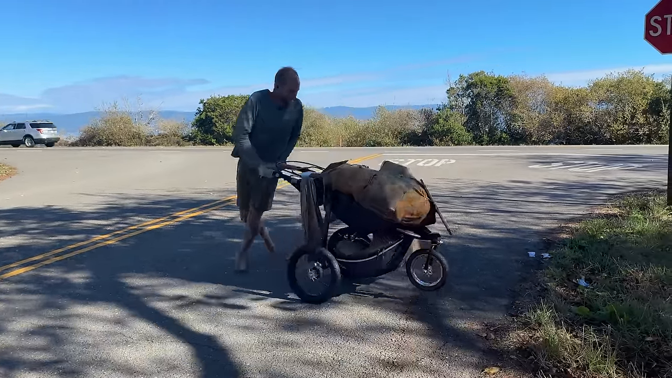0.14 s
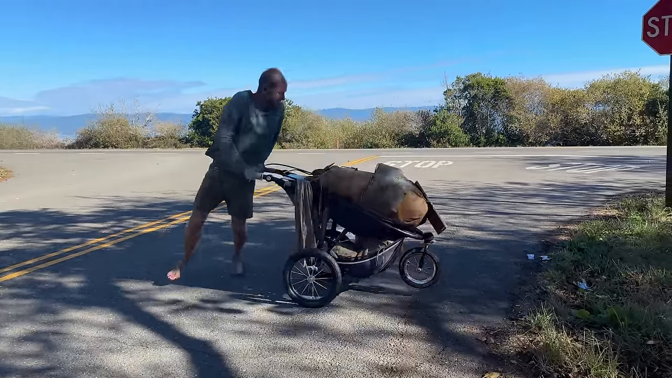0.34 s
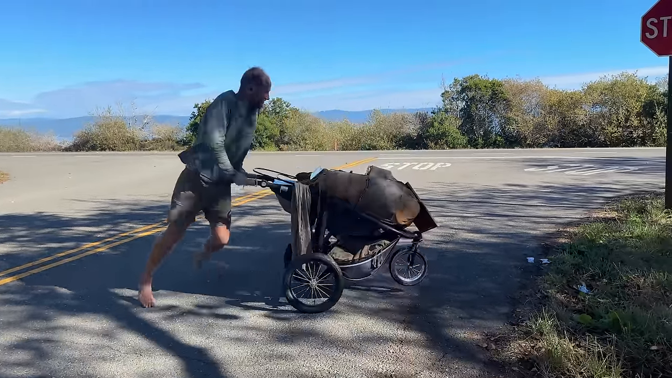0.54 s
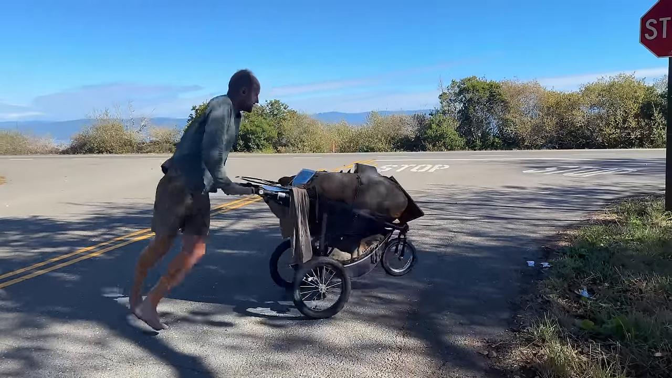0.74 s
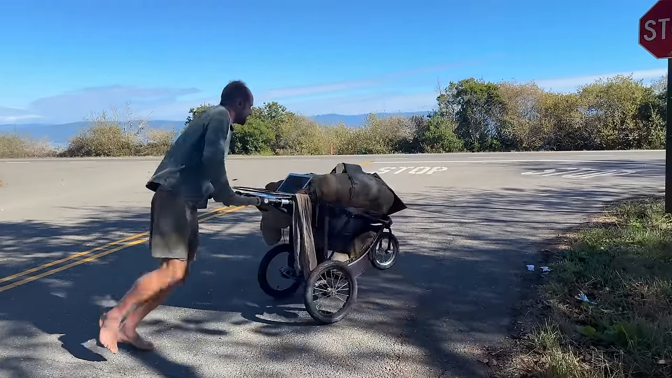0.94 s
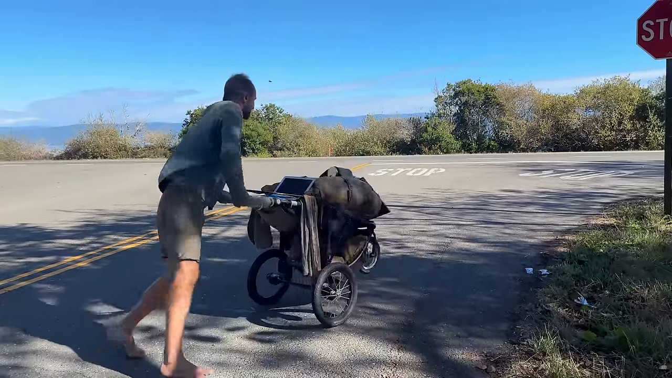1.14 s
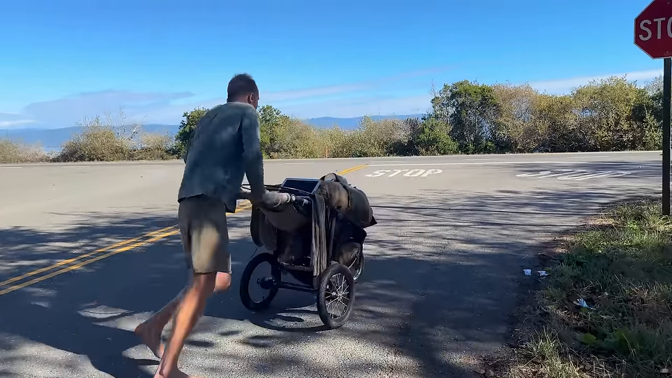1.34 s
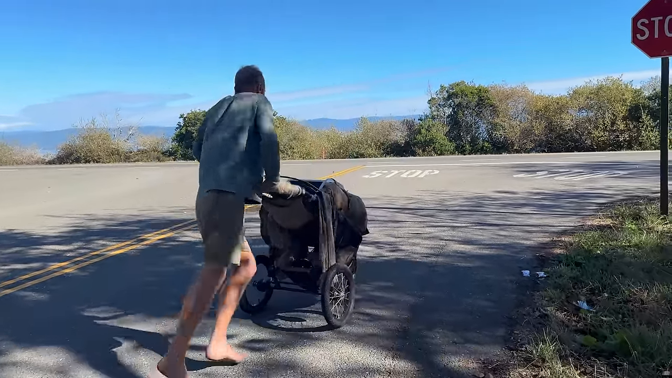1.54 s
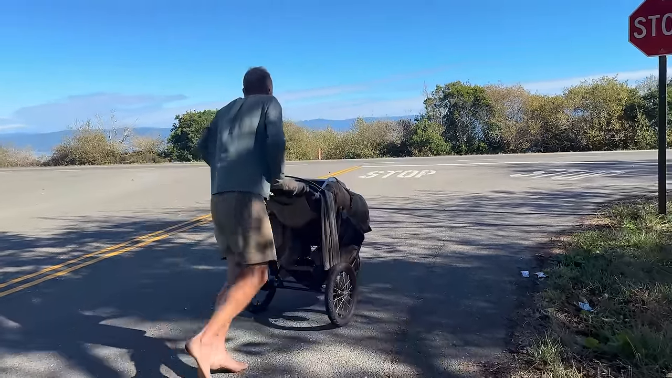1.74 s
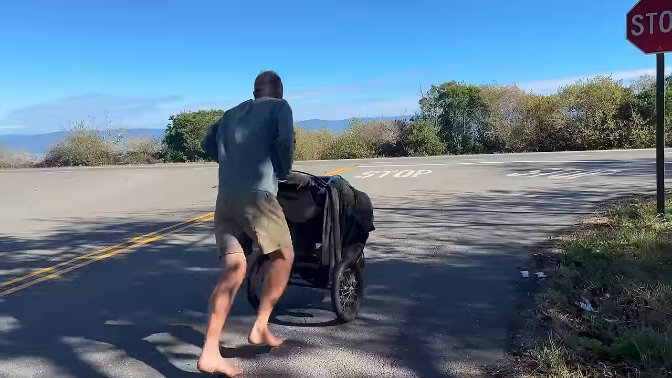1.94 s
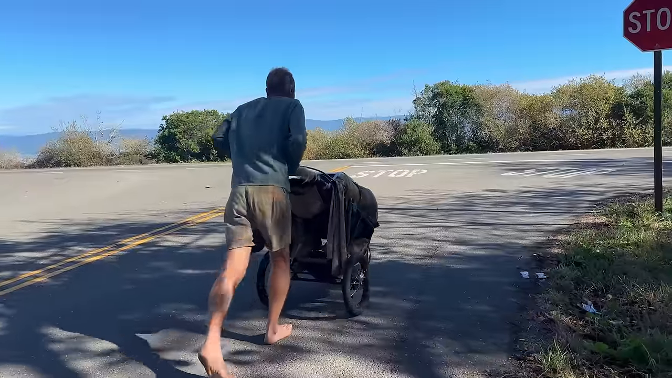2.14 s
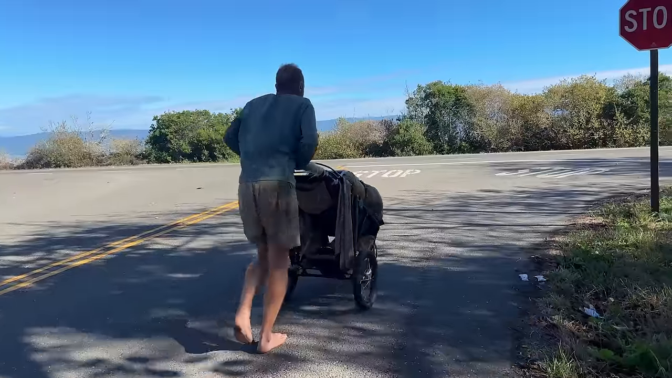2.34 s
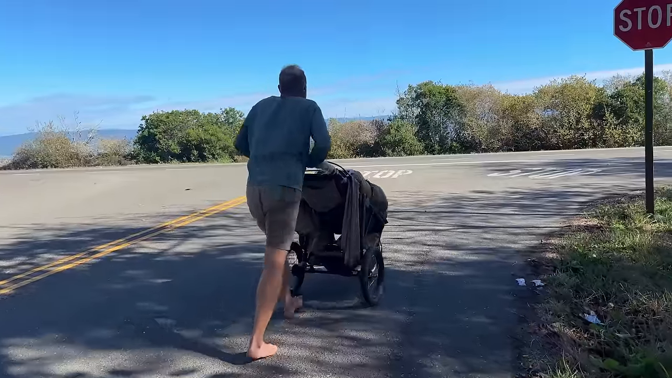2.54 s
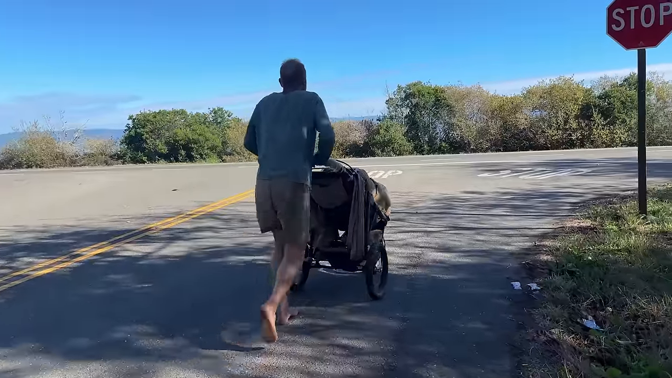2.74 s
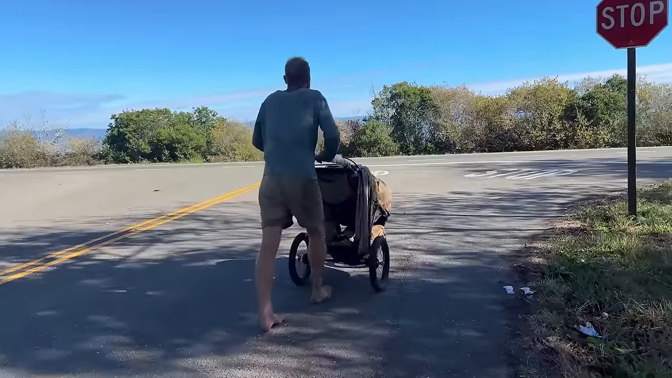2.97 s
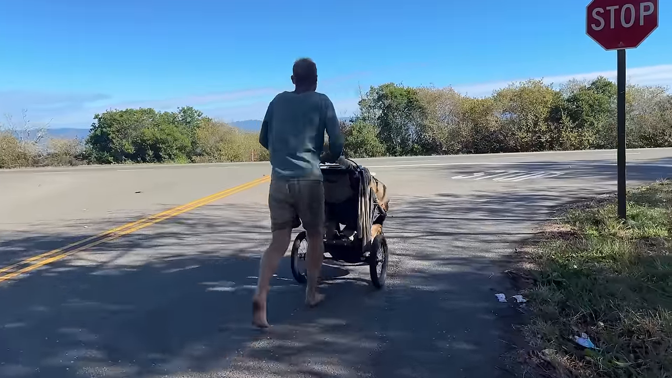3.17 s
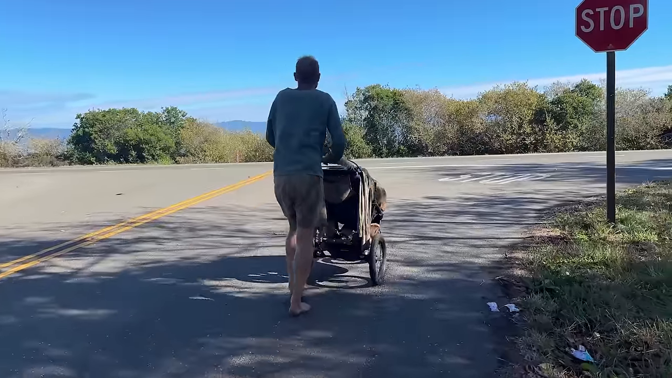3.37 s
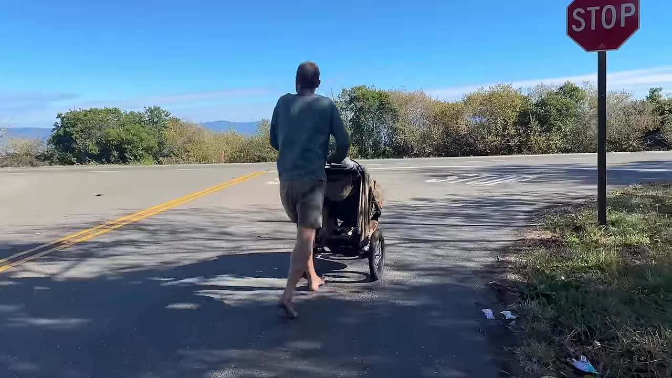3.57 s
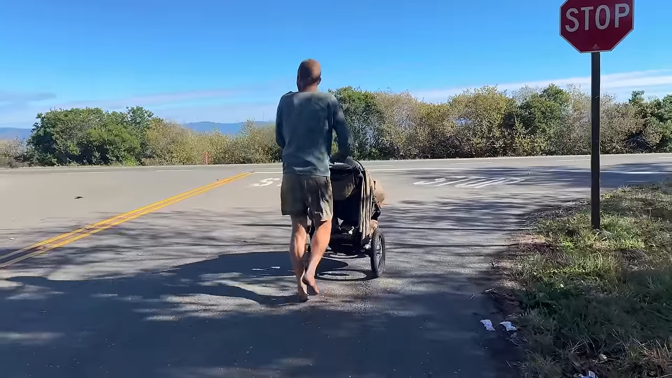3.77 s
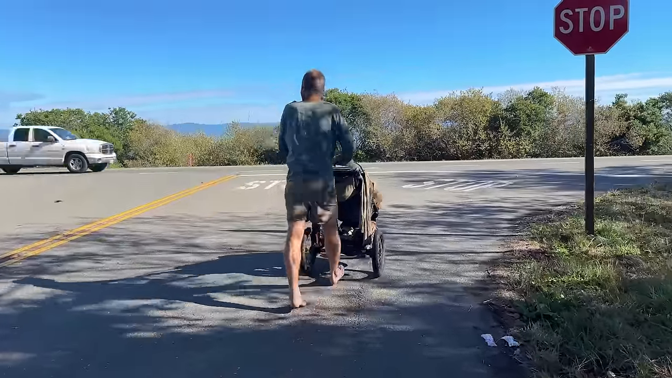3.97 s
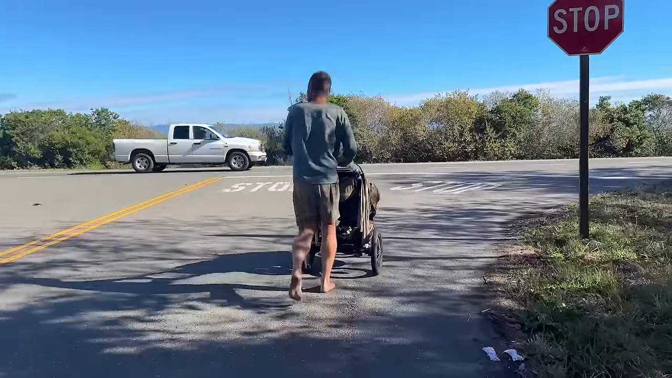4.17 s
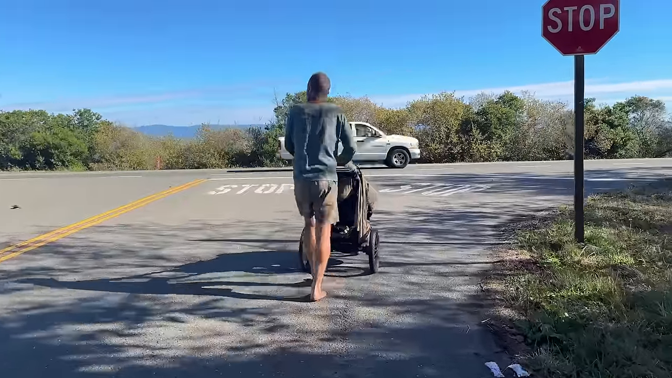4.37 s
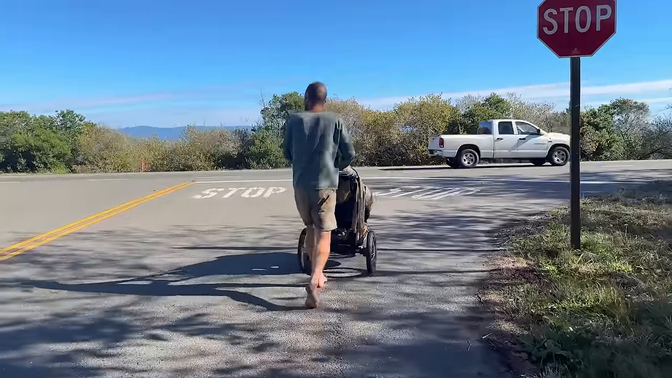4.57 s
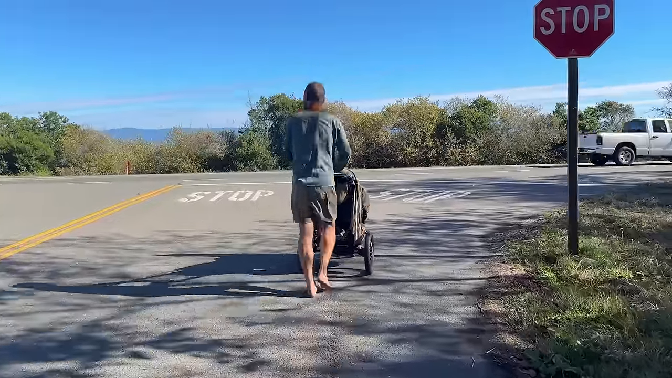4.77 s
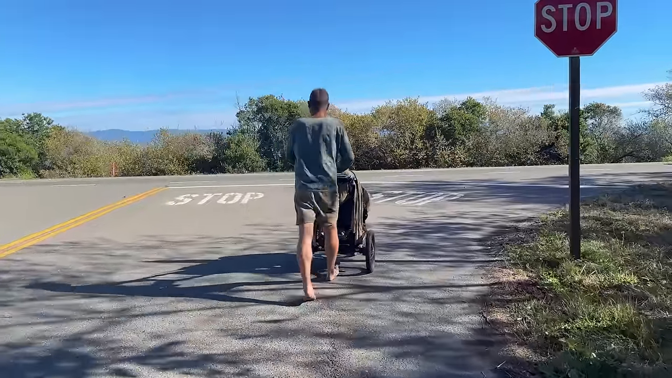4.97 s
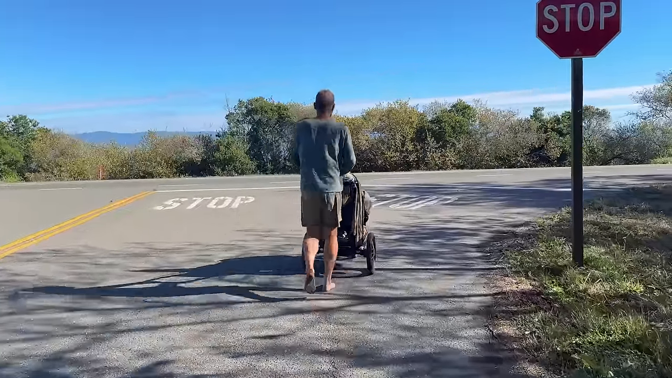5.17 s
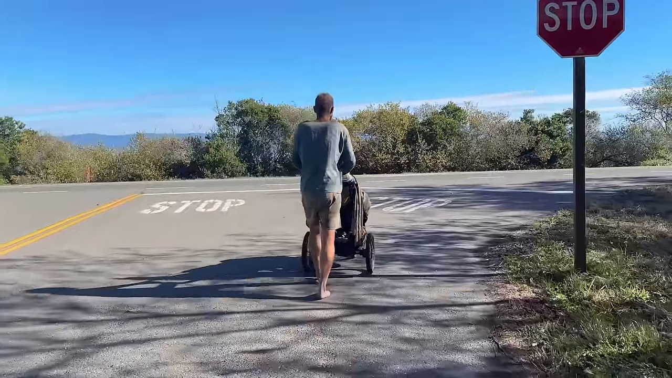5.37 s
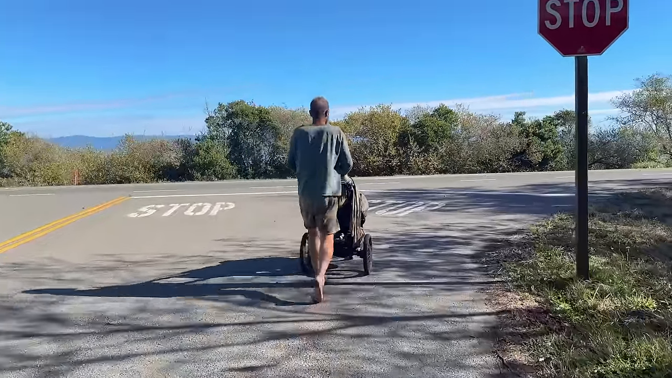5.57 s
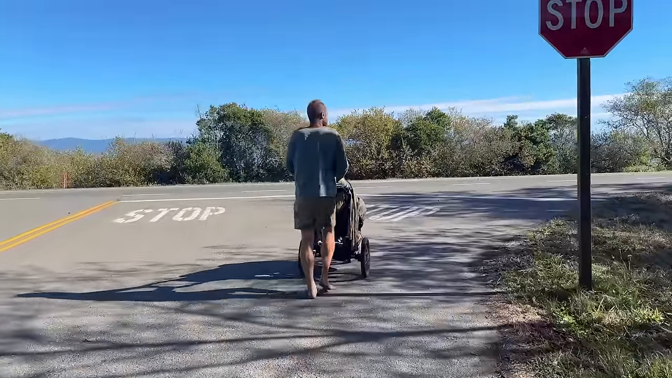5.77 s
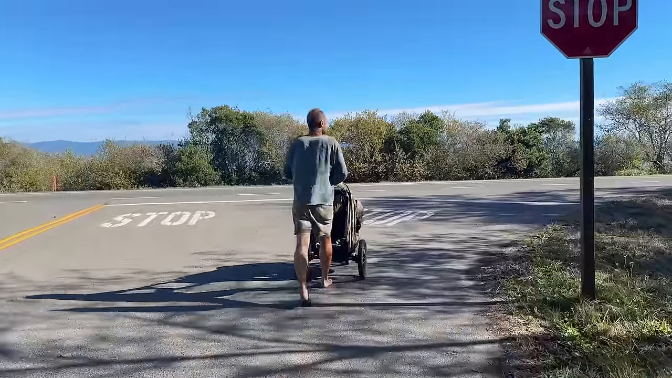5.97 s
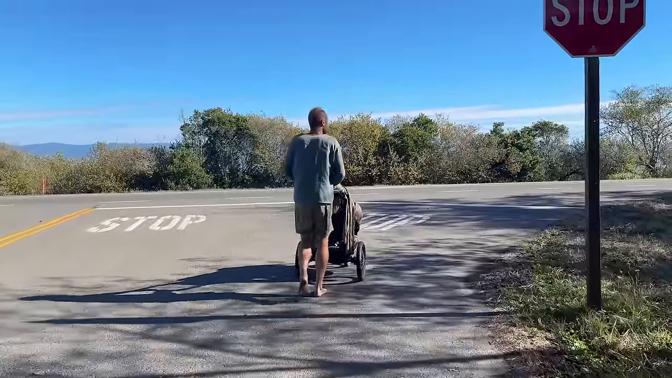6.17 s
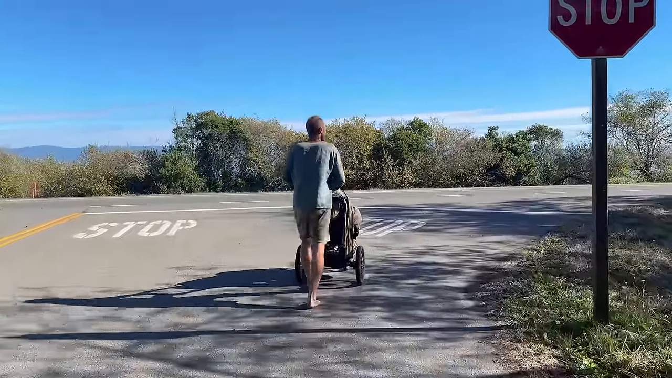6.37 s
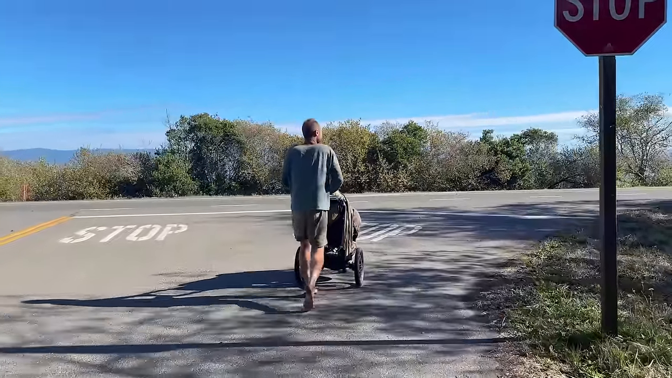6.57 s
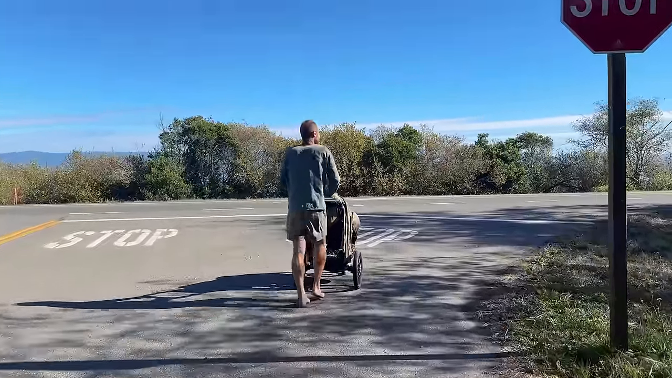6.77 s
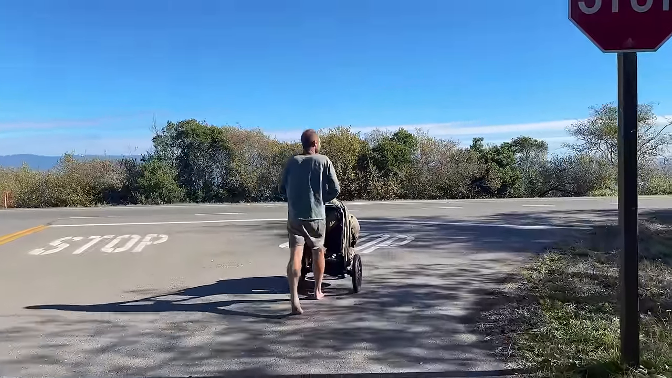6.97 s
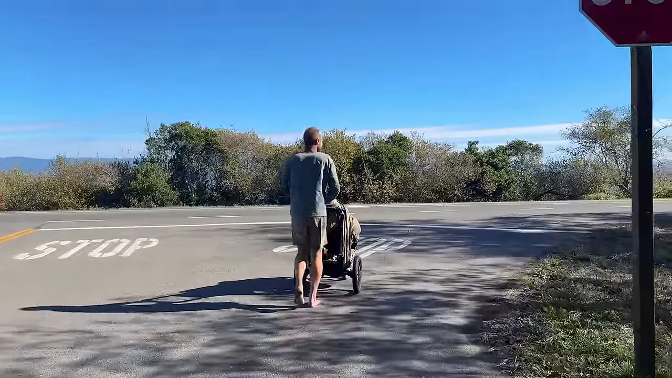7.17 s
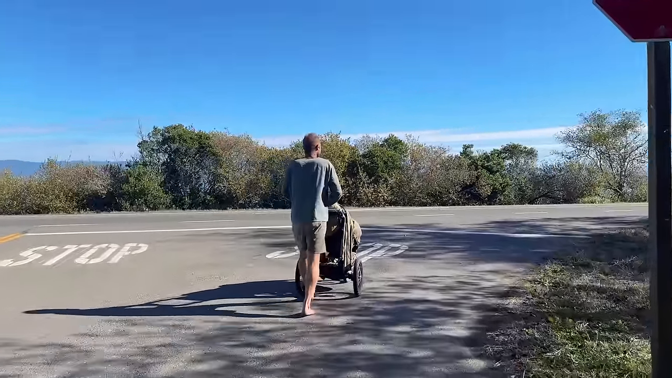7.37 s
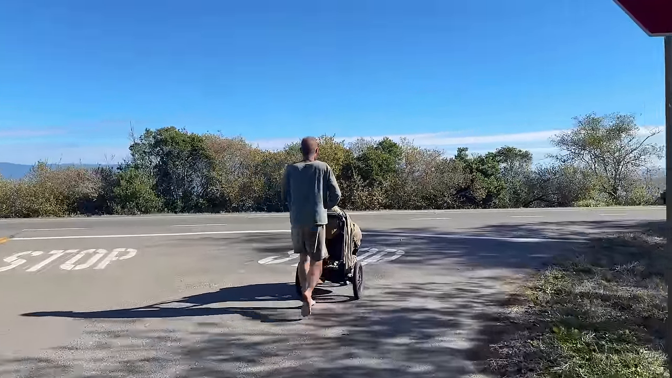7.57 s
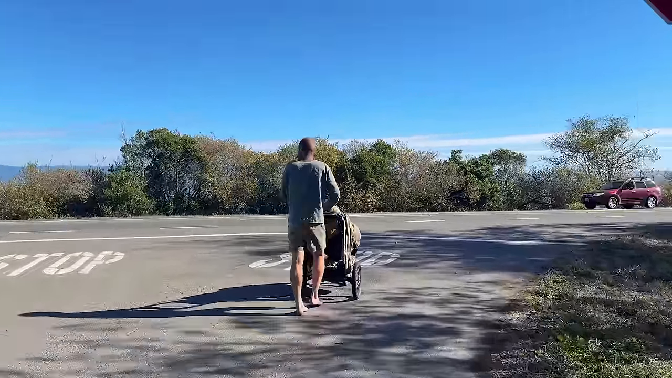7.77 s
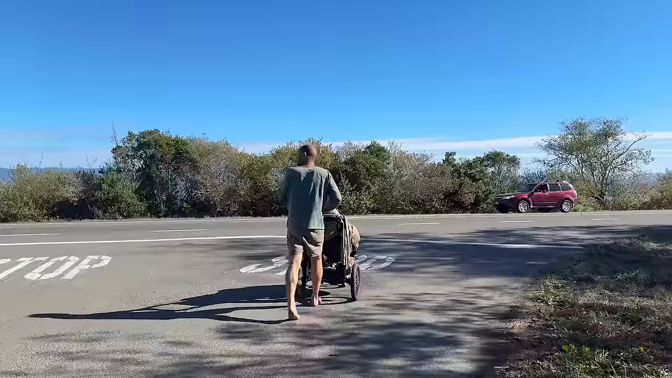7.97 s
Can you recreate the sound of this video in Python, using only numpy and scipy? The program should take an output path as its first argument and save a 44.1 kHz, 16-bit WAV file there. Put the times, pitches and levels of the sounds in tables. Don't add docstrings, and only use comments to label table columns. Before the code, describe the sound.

Roadside tyre roar swells and fades as a truck passes, with faint gritty footsteps, two twig cracks, soft low bumps and late insect hiss.

```python
import sys
import numpy as np
from scipy import signal
from scipy.fft import rfft, irfft, next_fast_len
from scipy.io import wavfile
from scipy.ndimage import uniform_filter1d

SR = 44100
rng = np.random.default_rng(int(sys.argv[2]) if len(sys.argv) > 2 else 0)


def voltage_ratio(decibels):
    exponent = np.asarray(decibels, float) / 20
    return 10 ** exponent


def wav_out(sig):
    wavfile.write(sys.argv[1], SR, np.round(np.clip(np.atleast_2d(sig).T, -1, 1) * 32767).astype(np.int16))


N = 353682
FRAME, HOP = 2048, 512

# at_s, place_m (left of centre), speed_m_per_s (to the left), lane_distance_m, roar_hz
VEHICLES = [
    (0.0, 4, 23, 17.8, 1020),
    (4.35, 0.56, -24, 14.5, 804),
    (8.0, -10, 19, 19.3, 827),
]
# rumble_db, drone_db, boom_db, roar_db, tread_db, hiss_db, rush_db, top_db
VEHICLE_LAYERS = [
    (-91, -39.5, -40, -37.5, -50, -69.5, -79, -88),
    (-32, -30.5, -28.5, -23.5, -32, -41.5, -48.5, -59),
    (-37.5, -44.5, -34.5, -29, -38, -49.5, -54, -75),
]
FAR_TRAFFIC = (-60.5, -59.5, -52, -51.5, -95, -90, -83, -100)
LAYER_HZ = [65, 140, 300, 780, 1750, 4200, 7600, 13500]
# frequency_hz, density_db (per Hz)
COLOUR = [(45, -15.5), (100, -14.5), (260, -21), (480, -24), (800, -27.5), (1050, -24), (1250, -23),
          (1900, -28.5), (2800, -31.5), (5000, -31), (8500, -30.5), (10000, -31), (14000, -25),
          (15800, -33)]
# loss_db (per doubled distance), near_hedge_db, far_hedge_db, louder_ahead_db
TRAVEL = [(5, 2.5, -0.9, -1.9), (8, -0.5, 7, 0.9), (7.5, 4.5, 4, 2), (6.5, 4.5, 1.7, 0.84),
          (7, 4.5, 1.5, 2), (6.5, 3, 9.5, 1.3), (8, 3, 14.5, 0.2), (6.5, 3.5, 20.5, 2.2)]
GAPS = [(-12, 2.1, 20.9, 3.8), (-29, 6.3, 27.6, 2.4)]
# start_s, engine_load_db, tyre_noise_db (rough or smooth asphalt)
EFFORT = [(0, -4, 1.5), (.7, 0.5, -0.8), (1.3, 1.5, -0.2), (1.85, 0.5, -4.5), (2.3, -1, -0.5),
          (2.65, 1.5, 1.5), (3.1, 2, 5.5), (3.45, 1.6, -5.5), (3.7, -1, 3), (4.1, 1, 0), (4.45, 2.2, -1.5),
          (4.75, 1.5, 1), (5.3, -0.6, 3.5), (6.0, -7, -1.5), (6.5, 1, -0.5), (7.0, 3, 3.5), (7.45, 4, 3.5),
          (7.75, 4.2, -0.5)]
# start_s, level_db
CLEARNESS = [(0, 6), (.5, -0.5), (1.9, -6), (2.5, -2.3), (3.0, -2), (3.35, 4), (3.8, 0.2), (4.2, 0.4),
             (4.4, -4.5), (4.9, -0.8), (5.3, -1.5), (5.8, 4), (6.3, 0.5), (6.8, 5.5), (7.3, -1.2),
             (8.02, -3.5)]
FOLLOWS = [(0.34, .01, .01), (1.46, .01, .01), (0.57, 0.11, .01), (.01, 1.06, .01), (.01, 0.4, 0.39),
           (.01, 0.43, 0.72), (.01, .3, 1.2), (.01, .2, 0.37)]
# side (-1 right to 1 left), left_minus_right_db, ground_dip_hz, dip_depth_db
BEARING = [(-0.96, 0.5, 120, -3), (-.88, -3, 410, 7.5), (-0.48, -8.5, 436, 9.5), (-0.33, -5.5, 330, 0.5),
           (.3, -1.2, 350, 3), (0.56, 1, 420, 5.5), (1, 3.5, 528, 6.5)]
# frequency_hz, centre_lag_samples, side_lag_samples, balance_db, pan_share, likeness (0-1)
PORTS = [(100, -3, 23, 0.2, 0.035, 1), (270, -3, 20, 1, 0.0024, 0.99), (500, -2.5, 21.6, 0, 0.51, 0.99),
         (950, 0, 16.2, 0, 1, 0.9), (1167, -0.5, 15.7, -0.5, 0.92, 1), (1590, 1, 16.4, -3, 0.38, 0.77),
         (1850, 4.5, 14.65, -2.5, 0.29, 0.87), (4200, 4.5, 15.16, -3, 0, 0.78),
         (7360, 3.5, 14.9, -1.5, 0.31, 0.42)]
# start_s, crank_hz, level_db
FIRING = [
    (2.4, 44.9, -55),
    (3.4, 44.86, -43),
    (3.75, 44.07, -32),
    (4.0, 43.7, -23.5),
    (4.35, 42.6, -45),
    (4.7, 40.24, -26),
    (5.3, 40.03, -41.5),
    (6.2, 39.05, -49),
]
# order (per crank turn), level_db
ENGINE_ORDERS = [(2, 0), (3.2, -1)]
# start_s, peak_db, echo_ms, echo_share, top_db
TWIGS = [
    (3.0575, 0.5, .317, 0.51, -25),
    (6.7651, -11.5, 0.27, 0.37, -12),
]
# start_s, peak_db, ring_hz, top_db, low_db
GRIT = [(0.1221, -32.5, 4050, -16, -22), (0.1434, -36, 3940, -27, -19), (0.4279, -30, 5400, -17, -23),
        (0.5087, -38, 3120, -22, -10), (0.5277, -39.5, 3350, -15, -10), (1.3788, -32.5, 3440, -20, -8.5),
        (1.4526, -35, 3530, -17, -11), (1.507, -32, 5140, -17, -14), (1.582, -32.5, 5760, -38, -15),
        (2.1419, -37.5, 4320, -19, -3), (2.1869, -36, 3300, -17, -0.5), (2.2039, -35.5, 4430, -20, -4),
        (2.2318, -32.5, 3050, -15.5, -5), (2.2463, -33, 5860, -16, -15), (2.332, -36, 3490, -14, -18),
        (2.3481, -35, 5320, -13, -19), (2.389, -37, 3350, -16, -17), (2.471, -23.5, 3520, -16, -16),
        (2.4963, -38, 3540, -16, -12), (2.6653, -31.5, 4370, -12, -27), (2.7656, -36.5, 3530, -13, -18),
        (6.8533, -38, 4500, -19, -14), (6.9243, -39, 4000, -5.5, -16), (6.9331, -36, 4470, -17.5, -26)]
# start_s, peak_db, ring_hz
FINE_GRIT = [(0.2078, -44, 4600), (0.28, -48, 3010), (0.436, -43, 5950), (0.476, -41, 3130),
             (0.6739, -44, 3710), (0.687, -44, 4220), (0.7383, -38, 5070), (0.7642, -42, 3270),
             (0.7764, -40.5, 4150), (0.857, -42.5, 3390), (0.9717, -39, 6500), (0.9864, -43, 6290),
             (1.0195, -41, 3550), (1.3005, -39, 6040), (1.3279, -43, 4650), (1.8731, -46, 3390),
             (1.884, -44, 4670), (1.9339, -39.5, 4470), (1.9614, -41.5, 3330), (2.106, -38.5, 3170),
             (2.1295, -37, 3390), (2.1685, -35, 3130), (2.2627, -37.5, 6220), (2.2952, -38, 3350),
             (2.5515, -40.5, 6200), (2.736, -43, 3270), (6.0594, -51, 4630), (6.135, -48, 4350),
             (6.1724, -49, 4480), (6.319, -42.5, 4080)]
# start_s, peak_db
PATTER = [(.4944, -46), (.5561, -51), (.602, -55), (.7577, -41), (1.0614, -51), (1.712, -51), (1.8332, -51),
          (1.8612, -58), (1.9031, -56), (1.928, -43), (2.0702, -53), (2.0941, -46), (2.2764, -45),
          (2.6994, -54)]
# start_s, level_db, length_s
LEAVES = [(0.138, -71, .03), (.5, -74, .05), (0.765, -66, 0.078), (1.0, -74, 0.076), (1.197, -65, 0.082),
          (1.533, -66, 0.021), (1.6, -63, .025), (1.74, -58.5, 0.02), (1.94, -72, 0.013), (2.195, -83, .08),
          (2.34, -66, 0.039), (2.493, -62, 0.046), (2.585, -52, 0.023), (2.67, -63, .03)]
# start_s, peak_db, pitch_hz
BUMPS = [(0.549, -34, 53), (0.949, -49, 65.6), (2.098, -27.5, 71.4), (2.329, -35, 68.6), (2.489, -29, 53.8),
         (5.778, -29.5, 72), (6.4, -28, 80.5), (6.558, -48, 72.5), (6.925, -32, 81)]
# start_s, centre_hz, level_db
INSECTS = [(5.4, 11200, -89), (5.63, 11200, -82), (5.96, 11000, -82), (6.22, 11200, -81),
           (6.66, 10700, -71.5), (7.11, 11400, -61.5), (7.46, 11300, -57), (7.81, 11000, -62),
           (8.02, 11200, -60)]


def columns(rows, at):
    x, *rest = np.transpose(rows)
    return [np.interp(at, x, c) for c in rest]


def over_hz(rows, hz):
    rows = np.array(rows, float)
    return [np.interp(np.log(hz + 1), np.log(rows[:, 0]), c)[:, None] for c in rows.T[1:]]


def drift(rate_hz, count=1):
    pole = np.exp(-80 * np.pi * rate_hz / SR)
    push = rng.standard_normal((count, N // 40 + 2002))
    slow = signal.lfilter([1], [1, -2 * pole, pole * pole], push)[:, 2000:]
    slow = slow / slow.std(axis=1, keepdims=True)
    return np.array([np.interp(np.arange(N) / 40, np.arange(len(v)), v) for v in slow])


def spectra(x):
    return signal.stft(x, SR, nperseg=FRAME, noverlap=FRAME - HOP)


def sound(z):
    return signal.istft(z, SR, nperseg=FRAME, noverlap=FRAME - HOP)[1][..., :N]


def patchy(shape, lines, frames):
    patches = uniform_filter1d(rng.standard_normal(shape), size=lines, axis=0)
    patches = uniform_filter1d(patches, size=frames, axis=1)
    return patches / patches.std()


def band(x, low_hz, high_hz):
    return signal.sosfilt(signal.butter(2, [low_hz, min(high_hz, .45 * SR)], "band", fs=SR, output="sos"), x)


def bell(hz, centre_hz, octaves):
    return np.exp(-.5 * (np.log2((hz[:, None] + 1) / centre_hz) / octaves) ** 2)


def vehicles(s):
    at, place, speed, lane, roar_hz = np.transpose(VEHICLES)[:, :, None]
    along = place + speed * (s - at)
    distance = np.hypot(along, lane)
    closing = -along * speed / distance
    hidden = []
    for right, right_blur, left, left_blur in GAPS:
        opening = np.tanh((along - right) / right_blur) - np.tanh((along - left) / left_blur)
        hidden.append(1 - opening / 2)
    loss, near, far, ahead = np.transpose(TRAVEL)[:, :, None, None]
    db = np.transpose(VEHICLE_LAYERS)[:, :, None] - loss * np.log2(distance / lane)
    db = db - near * hidden[0] - far * hidden[1] + ahead * closing / abs(speed)
    controls = columns(EFFORT, s) + columns(CLEARNESS, s)
    db = db + (np.array(FOLLOWS) @ controls)[:, None]
    power = voltage_ratio(db) ** 2
    lead = power[3] / power[3].sum(axis=0)
    side = (lead * 1.031 * np.sin(np.arctan2(along, lane) - 0.046)).sum(axis=0)
    pitch_hz = roar_hz * (1 + closing / 343) * (1 - 0.16 * (lane / distance) ** 2)
    total = power.sum(axis=1) + voltage_ratio(np.array(FAR_TRAFFIC))[:, None] ** 2
    return 10 * np.log10(total), side, (lead * pitch_hz).sum(axis=0)


def firing():
    crank_hz, db = columns(FIRING, np.arange(N) / SR)
    turn = 2 * np.pi * np.cumsum(crank_hz * (1 + 0.0116 * drift(2.7)[0])) / SR
    waver = voltage_ratio(2.2 * drift(4.0, count=2))
    tone = sum(voltage_ratio(g) * w * np.sin(k * turn) for (k, g), w in zip(ENGINE_ORDERS, waver))
    return voltage_ratio(db) * tone


def road_colour(hz, layers, side, roar_hz, dip_hz, dip_db):
    place = np.interp(np.log(hz + 1), np.log(LAYER_HZ), np.arange(len(layers)))
    below = np.minimum(place.astype(int), len(layers) - 2)
    part = (place - below)[:, None]
    db = (1 - part) * layers[below] + part * layers[below + 1] + over_hz(COLOUR, hz)[0]
    db = db - dip_db * bell(hz, dip_hz, 0.31)
    db = db + (2.85 + 2.0 * abs(side)) * bell(hz, roar_hz, .24 - 0.1 * abs(side))
    db = db - (4.5 - 2.3 * side) * side ** 4 * bell(hz, 1.48 * roar_hz, 0.088)
    db = db + np.clip(side, 0, 1) * (7.6 * bell(hz, 6000, 0.084) + 3.0 * bell(hz, 2580, 0.45))
    db = db - 1.4 * np.clip(-side, 0, 1) * bell(hz, 2650, 0.069)
    return db + .9 * patchy(db.shape, 15, 13)


def traffic():
    hz, s, (common, left, right) = spectra(rng.standard_normal((3, N)))
    layers, side, roar_hz = vehicles(s)
    pan_db, dip_hz, dip_db = columns(BEARING, side)
    gain = voltage_ratio(road_colour(hz, layers, side, roar_hz, dip_hz, dip_db)) * np.sqrt(SR / 2)
    centre, span, balance_db, share, alike = over_hz(PORTS, hz)
    alike = np.clip(alike, 0, 1)
    common = np.sqrt(alike) * gain * common + spectra(firing())[2]
    own = np.sqrt(1 - alike) * gain
    half_lag = np.exp(1j * np.pi * hz[:, None] * (centre + span * side) / SR)
    tilt = voltage_ratio((balance_db + share * pan_db) / 2)
    from_right, from_left = np.clip(-side, 0, 1), np.clip(side, 0, 1)
    notch = voltage_ratio(-5 * bell(hz, 6150, 0.041) * from_right)
    notch = notch * voltage_ratio(-3 * bell(hz, 2070, 0.062) * from_right)
    notch = notch * voltage_ratio(-3.5 * bell(hz, 8500, 0.07) * from_left)
    lift = voltage_ratio(13.5 * bell(hz, 8370, .04) * from_left)
    left_port = (common * half_lag + own * left) * tilt * notch
    right_port = (common / half_lag + own * right) / tilt * lift
    return sound(np.array([left_port, right_port]))


def twigs():
    out = np.zeros(N)
    for s, db, echo_ms, share, top_db in TWIGS:
        crack, i = np.zeros(600), round(s * SR)
        bounces = [0, round(echo_ms * SR / 1000), round(2 * echo_ms * SR / 1000)]
        crack[bounces] = [1, -share, 0.27 * share]
        crack[1:] += 0.019 * rng.standard_normal(599) * voltage_ratio(-60 * np.arange(599) / SR / 0.012)
        wood = voltage_ratio(-3.5) * band(crack, 900, 2000) - voltage_ratio(3.5) * band(crack, 2000, 3000)
        body = band(crack, 3300, 8300) + voltage_ratio(.7 * db) * wood
        crack = signal.sosfilt(signal.butter(6, 15800, fs=SR, output="sos"), crack)
        out[i:i + 600] += voltage_ratio(db + 6.5) * (body + voltage_ratio(top_db) * band(crack, 8900, 24000))
    return np.array([np.roll(out, 6), out])


def grit():
    fine = FINE_GRIT + [(*row, 3700) for row in PATTER]
    grains = GRIT + [(*row, -16.5, -12.5) for row in fine]
    out, t = np.zeros((2, N + 2000)), np.arange(1800) / SR
    snap, crumble = voltage_ratio(5.5 - 60 * t / 0.0099), voltage_ratio(-18.0 - 60 * t / 0.082)
    shape = (1 - np.exp(-(t / 0.0018) ** 2)) * (snap + crumble)
    pan = voltage_ratio([[-1.5], [1.5]])
    for s, db, ring_hz, top_db, low_db in grains:
        burst = rng.standard_normal((3, len(t)))
        burst = (burst[0] + 1.03 * burst[1:]) * shape
        body = band(burst, 1800, 7750) + 0.77 * band(burst, ring_hz * 0.925, ring_hz * 1.1)
        body = body + voltage_ratio(low_db + 13.5) * band(burst, 1850, 3160)
        top = band(band(burst, 6650, 15000), 3400, 14800)
        i = round((s - .0006) * SR)
        out[:, i:i + len(t)] += voltage_ratio(db + 2.5) * (body * pan + voltage_ratio(top_db + 9.0) * top)
    return out[:, :N]


def leaves():
    t = np.arange(N) / SR
    swell = sum(voltage_ratio(db) * np.exp(-.5 * ((t - s) / length) ** 2) for s, db, length in LEAVES)
    sizes = voltage_ratio(4.0 * np.minimum(rng.exponential(1, (2, N)), 5)) * rng.choice([-1, 1], (2, N))
    grains = sizes * (rng.random((2, N)) < 4000 / SR)
    bright = band(grains, 9000, 16000) + voltage_ratio([[-3], [-1.5]]) * band(grains, 3500, 9000)
    return swell * bright / bright.std()


def bumps():
    t, out = np.arange(N) / SR, np.zeros(N)
    for s, db, hz in BUMPS:
        swell = np.exp(-.5 * ((t - s - .04) / 0.029) ** 2)
        out += voltage_ratio(db - 4) * swell * np.sin(2 * np.pi * hz * (t - s))
    return out


def insects():
    hz, s, z = spectra(rng.standard_normal(N))
    centre_hz, db = columns([(5.2, 11000, -100)] + INSECTS, s)
    ragged = voltage_ratio(1.4 * patchy(z.shape, 20, 5))
    shape = bell(hz, centre_hz, 0.095) * ragged * np.sqrt(SR / 2 / 900)
    return sound(z * shape * voltage_ratio(db + 2.5)) * voltage_ratio(1.5 * drift(3.1)[0])


def scene():
    soft = traffic() + grit() + leaves() + bumps() + insects()
    return signal.sosfilt(signal.ellip(10, .5, 50, 15800, fs=SR, output="sos"), soft) + twigs()


def band_limit(x):
    return signal.sosfilt(signal.butter(12, 16400, fs=SR, output="sos"), x)


def record(dry):
    size = next_fast_len(N + 100)
    left, right = rfft(dry, size)
    hz = np.arange(len(left)) * SR / size
    top = 1 / (1 + np.exp(-(hz - 9000) / 30))
    copy = left * np.exp(1j * (2 * np.pi * hz * 15.13 / SR + 1.1))
    mix = irfft(np.array([left, (1 - top) * right + top * copy]), size)[:, :N]
    mix = signal.sosfilt(signal.butter(5, 48.0, "high", fs=SR, output="sos"), mix)
    return band_limit(mix)


dry = scene()
out = record(dry)
wav_out(out)
```